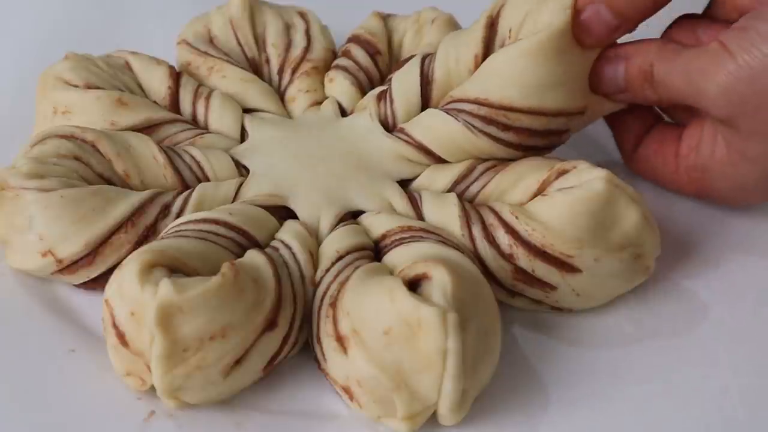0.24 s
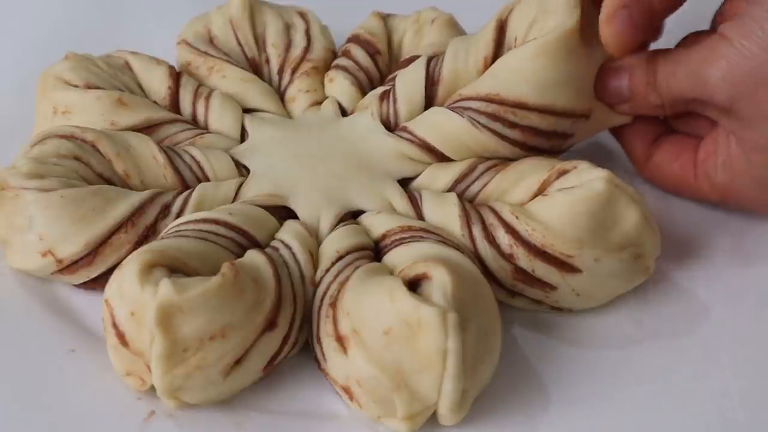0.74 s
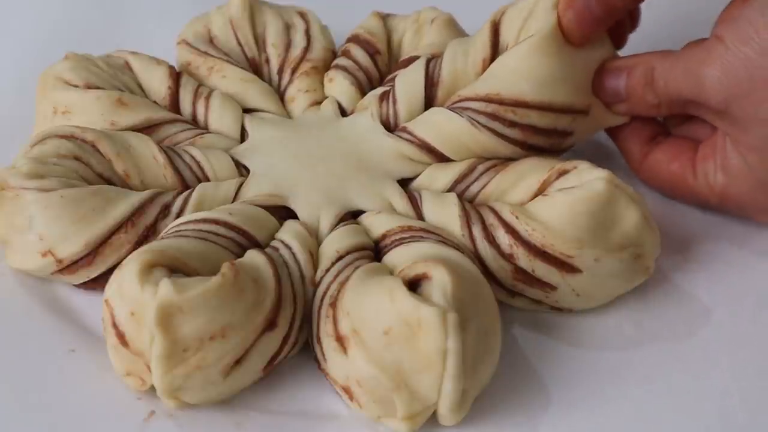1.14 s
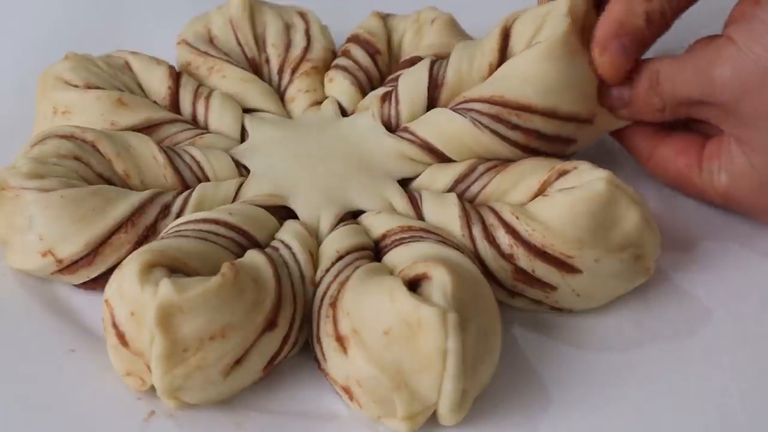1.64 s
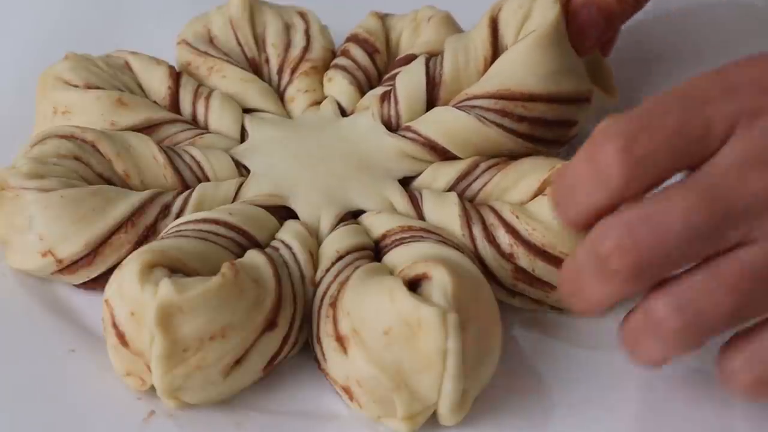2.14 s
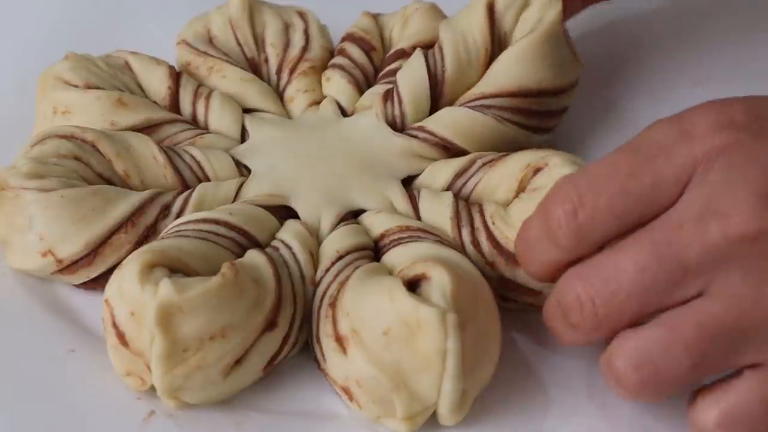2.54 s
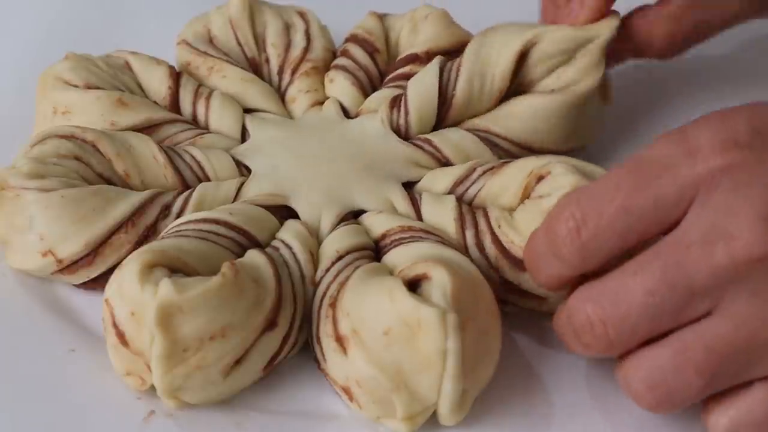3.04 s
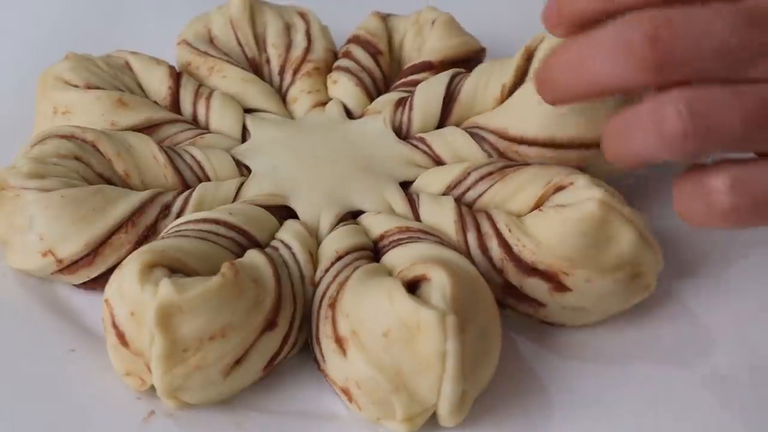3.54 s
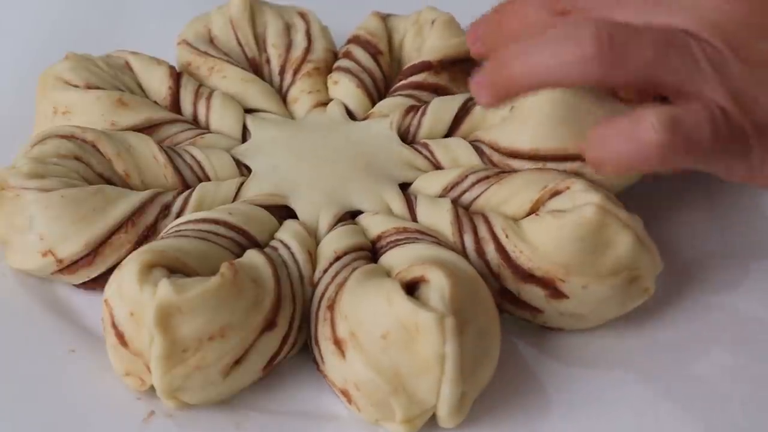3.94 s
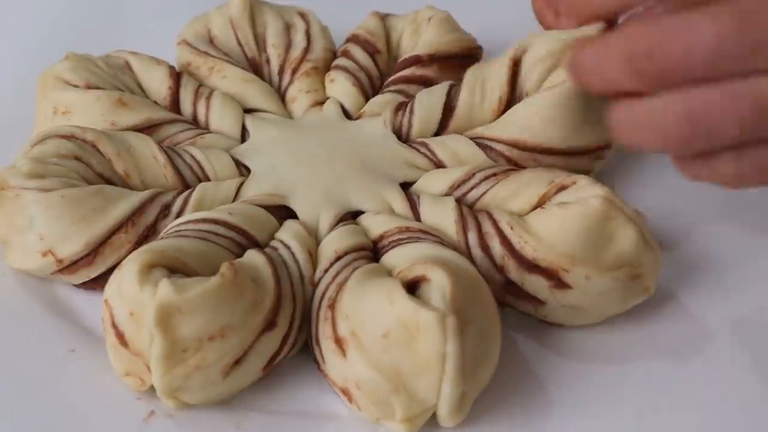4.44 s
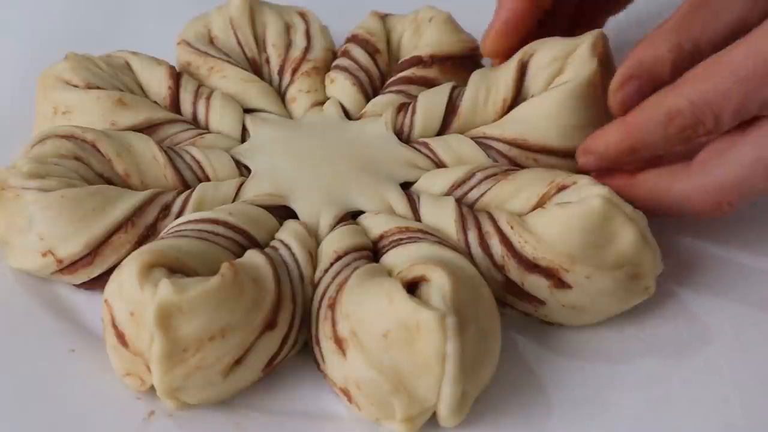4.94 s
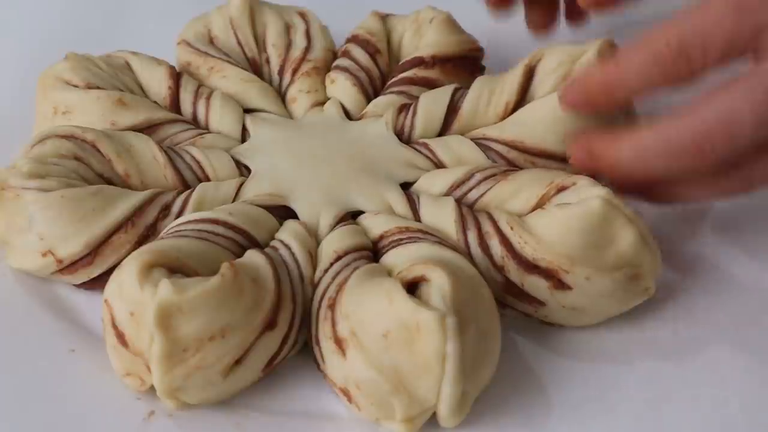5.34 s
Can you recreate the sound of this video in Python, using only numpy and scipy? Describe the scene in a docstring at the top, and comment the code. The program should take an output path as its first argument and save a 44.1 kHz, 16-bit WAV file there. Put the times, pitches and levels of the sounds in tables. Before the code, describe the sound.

Hands pinch soft dough on baking paper, making close, crisp crinkles and sharp snaps in uneven bursts.

```python
"""Sharp paper snaps and a soft rustle: hands pinch dough on baking paper, close by, in a small kitchen.
Creases buckle one by one, and each makes the sheet ring for a moment. In between, paper, skin and
dough rub together, which hisses, crackles and sometimes squeaks. The hard walls add a short echo,
a faint hum lies underneath, and the loudest snaps clip."""
import sys
import numpy as np
from scipy import signal
from scipy.fft import rfft, irfft
from scipy.io import wavfile
from scipy.ndimage import uniform_filter1d

SR = 44100
rng = np.random.default_rng(int(sys.argv[2]) if len(sys.argv) > 2 else 0)


def put_to_file(sound):
    """Save the sound as 16-bit audio at rate SR, in the file named by the first command-line argument."""
    columns = np.atleast_2d(sound).T  # one column per channel
    safe = np.clip(columns, -1, 1)
    whole_steps = np.round(safe * 32767)
    wavfile.write(sys.argv[1], SR, whole_steps.astype(np.int16))


N = 246078

# Tone of the room's hum and hiss: frequency_hz, relative_level_db
HUM_TONE = [(24, -43.5), (40, -7.5), (167, -4.5), (257, 2), (545, -4), (755, -3), (971, -7.5), (1420, -11),
            (5220, -15.5), (8210, -18), (15000, -21.5), (16200, -32.5)]
# Time the kitchen's echo takes to fade by 60 dB: frequency_hz, fade_s
ECHO_FADES = [(500, 0.26), (1500, 0.099), (4000, 0.16), (7000, 0.22), (12000, 0.21)]
# How the paper's sound is coloured on its way to the microphone: frequency_hz, gain_db
MIC_TONE = [(200, -15), (600, -0.5), (1000, -3), (1500, -0.58), (4000, -1.12), (7000, -1), (8600, -5),
            (11000, -3.5), (13500, -9), (16500, -10.5)]
# Skin or dough catching on the sheet: start_s, length_s, pitch_hz, width_hz, level_db
SQUEAKS = [(0.86, 0.027, 2080, 500, -53), (0.429, 0.05, 5330, 1507, -62.5),
           (0.542, 0.051, 4960, 1500, -61.5), (1.88, 0.044, 453, 700, -37.5), (1.953, 0.036, 400, 700, -42),
           (2.393, 0.061, 650, 400, -53.5), (3.142, 0.032, 660, 400, -57), (1.003, 0.12, 2600, 900, -52.5),
           (1.276, 0.026, 2490, 600, -62), (2.239, 0.035, 2620, 300, -54), (2.284, 0.023, 2550, 604, -57),
           (3.057, 0.016, 1094, 503, -45.5), (3.458, 0.07, 2620, 716, -44.5)]
# Strokes of the hands: full_pressure_s, build_up_s, hold_s, rustle_db, rustle_pitch_hz,
# skin_hiss_db, dough_drag_db
STROKES = [(0.002, 0.034, .02, -49, 4430, -63, -56), (0.042, 0.046, .005, -37, 3700, -50, -70),
           (0.451, .09, .03, -67, 6500, -57, -87), (0.556, .2, .015, -66, 5740, -56.5, -81),
           (0.659, .06, .01, -51.5, 5750, -57.5, -84), (0.793, 0.22, .045, -49.5, 5710, -61, -68),
           (0.952, .05, 0.054, -57, 5000, -66, -72), (1.018, 0.12, 0.05, -51, 3140, -63.5, -61),
           (1.224, .04, .03, -71, 5360, -71, -76), (1.434, .08, .03, -57.5, 5566, -58, -74),
           (1.559, .08, .003, -62, 4425, -62, -65), (1.736, 0.055, 0.055, -51, 6210, -63.5, -82),
           (1.81, 0.088, 0.027, -47, 4400, -61, -55.5), (1.871, 0.018, .005, -29.5, 3786, -55, -34),
           (1.906, .08, 0.023, -23.5, 4190, -36, -29), (2.012, 0.12, 0.044, -39.5, 4105, -68, -63),
           (2.246, .025, .025, -57, 4220, -65, -77), (2.335, .02, .025, -51, 4310, -80, -77),
           (2.399, .06, .05, -34.5, 3746, -72, -41), (2.596, 0.18, 0.012, -28, 4340, -48, -33.5),
           (2.684, .1, 0.027, -46, 4290, -70, -61), (2.837, 0.07, .03, -46, 3370, -80, -76.5),
           (3.154, 0.2, 0.043, -39.5, 4400, -52, -47), (3.272, .2, .05, -46.5, 4530, -61, -60),
           (3.37, 0.021, 0.0028, -33.5, 3790, -80, -41), (3.482, .09, 0.0092, -36.5, 5180, -51, -61),
           (3.674, .07, .003, -46.5, 4700, -60, -52), (3.897, .025, 0.077, -44.5, 4950, -60.5, -63.5),
           (3.987, 0.024, .01, -26, 4160, -49, -33.5), (4.068, 0.1, 0.027, -32, 4140, -48, -36.5),
           (4.163, .1, 0.048, -43.5, 4860, -60.5, -72), (4.289, 0.089, .03, -38, 5070, -46.5, -48),
           (4.366, 0.043, .01, -42.5, 4890, -46, -50), (4.402, 0.018, .015, -35.5, 5020, -49, -58),
           (4.453, .12, .005, -34.5, 4620, -44.5, -48), (4.606, .04, .09, -34.5, 4000, -68, -40.5),
           (4.749, 0.092, .005, -28, 4350, -45, -37.5), (4.831, 0.11, 0.0027, -35, 3600, -75, -37.5),
           (5.108, 0.028, .02, -59.5, 4520, -80, -73), (5.17, 0.11, 0.079, -43, 4690, -58.5, -58),
           (5.334, .027, .045, -23, 4770, -34.5, -41.5), (5.416, 0.13, 0.013, -28, 3996, -52, -32.5),
           (5.517, 0.084, .06, -50.5, 4215, -85, -66)]
# Creases that buckle: start_s, level_db, pitch_hz, length_ms, relative_treble_db, relative_bass_db
SNAPS = [(0.0348, -6, 4240, 1.76, -18, -38.5), (0.38, -50.5, 2700, 1.14, -21, -5),
         (0.398, -55, 2900, 1.7, -22, -4), (0.5864, -56, 5990, 1.2, 7, -14),
         (0.7662, -38.5, 4940, 2.4, -9, -21), (0.884, -49, 2130, 3.9, -25, -28),
         (0.986, -40.5, 3100, 7.2, -33, -29), (1.0108, -34.5, 2650, 13, -40, -30),
         (1.0295, -37, 2840, 3.4, -35, -21.5), (1.0658, -33.5, 2960, 3, -37, -30.5),
         (1.0775, -38, 2680, 3.2, -36, -33), (1.0956, -48, 2720, 1.0, -22, -19),
         (1.1156, -48.5, 2520, 0.63, -25, -20), (1.555, -48, 4460, 6.1, -6, -10),
         (1.8056, -21.5, 4350, 0.87, -32.5, -12), (1.839, -13, 4200, 1.3, -30, -19),
         (1.843, -22, 2980, 0.45, -49, -30), (1.884, -16, 3770, 0.89, -34, -12),
         (1.891, -1, 4280, 0.77, -20, -18.5), (1.9138, -16, 4030, 16, -6.5, -10.5),
         (1.916, -17, 4030, 4.3, -28, -14), (1.92, -12, 4300, 2.6, -38, -22),
         (1.9558, -5.5, 4400, 2.9, -12.5, -19.5), (1.9628, -2.5, 3820, 0.97, -11, -13.5),
         (2.043, -17.5, 4300, 0.41, -26, -24), (2.2883, -55.5, 2890, 7.8, -17, -10),
         (2.2957, -49, 3130, 6.1, -23, -14), (2.3734, -31.5, 3470, 3.1, -36, -12),
         (2.3925, -19.5, 3540, 11, -60, -10), (2.4119, -24.5, 4040, 2.0, -44, -5),
         (2.452, -15, 4070, 1.7, -22.5, -20.5), (2.4785, -23, 3870, 1.7, -26, -37.5),
         (2.4972, -31, 3840, 2.8, -36, -28), (2.5261, -12.5, 3950, 6.9, -24, -13),
         (2.5377, -24, 3040, 7.8, -40, -4.5), (2.5648, -15, 4100, 8.7, -37, -12.5),
         (2.5887, -19, 3730, 7, -39, -28.5), (2.596, -4, 4850, 1.7, -11, -16.5),
         (2.6351, -23.5, 3050, 7.5, -27, -6), (2.7172, -34.5, 3790, 8.9, -36, -33.5),
         (2.7444, -45, 3830, 4.4, -24, -16), (2.8148, -37.5, 2920, 2.1, -31, -12.5),
         (2.8295, -38, 3200, 1.04, -36, -21), (2.8399, -28.5, 3380, 1.1, -41.5, -25.5),
         (2.9193, -42, 3080, 8.3, -27.5, -4.5), (3.0026, -45, 2880, 0.78, -31, -9),
         (3.0615, -36, 3100, 0.74, -7.5, -5), (3.1099, -24, 5100, 1.2, -41, -30.5),
         (3.1173, -26, 4170, 0.57, -30.5, -30.5), (3.137, -21, 4370, 4.8, -44.5, -13.5),
         (3.147, -20.5, 4250, 0.5, -23, -11.5), (3.151, -11, 4330, 2.6, -21.5, -19.5),
         (3.195, -8, 3680, 0.24, -25, -36), (3.2396, -32, 3770, 2.6, -39, -13),
         (3.2942, -38.5, 3670, 4.8, -25, -13), (3.3626, -26.5, 3800, 3.2, -43, -20.5),
         (3.3708, -16, 3350, 4.7, -65, -40.5), (3.3968, -26, 3630, 2.5, -43, -20.5),
         (3.408, -31, 3960, 1.5, -44, -17), (3.451, -14.5, 4130, 1.3, -18.5, -21.5),
         (3.5418, -35, 3240, 4.7, -29, -24.5), (3.6563, -13, 4630, 2, -41, -25),
         (3.8848, -33.5, 4080, 0.4, -29, -22), (3.979, -16.5, 4870, 4.8, -26.5, -12),
         (4.0144, -21, 3280, 6, -32, -11.5), (4.0306, -22.5, 3570, 2.2, -28, -33),
         (4.051, -25.5, 4800, 5.9, -37, -9), (4.0618, -7.5, 5260, 2.8, -14.5, -17),
         (4.0664, -9, 3900, 5.8, -15, -21), (4.09, -16, 3400, 0.76, -27, -25),
         (4.2568, -40.5, 3660, 8.6, -34, -12), (4.298, -29, 5230, 6.1, -20, -31),
         (4.3107, -23, 4640, 2.4, -11, -6), (4.3304, -27, 4230, 0.54, -55.5, -6.5),
         (4.3662, -33.5, 4420, 9.6, -13, -11), (4.4518, -20.5, 3560, 1.4, -38, -27.5),
         (4.4585, -21.5, 6400, 8.6, -38, -27), (4.5736, -35.5, 4470, 0.95, -37, -12.5),
         (4.5843, -22, 4120, 1.1, -45, -18.5), (4.601, -25, 3960, 1.7, -37.5, -25),
         (4.6076, -16.5, 3530, 3.1, -40, -14.5), (4.6122, -10.5, 4450, 1, -36, -13.5),
         (4.6385, -14.5, 3130, 6.8, -38, -9.5), (4.6743, -20, 3850, 1.5, -46, -13),
         (4.7017, -26, 3480, 3.2, -35.5, -28.5), (4.7099, -24, 4260, 0.8, -38, -14),
         (4.721, -19.5, 3670, 0.99, -36, -42), (4.7402, -18, 3040, 3.1, -32, -12.5),
         (4.757, -28, 3800, 4.2, -29.5, -29), (4.778, -18.5, 3700, 1.3, -35, -12.5),
         (4.8106, -14.5, 3520, 0.4, -39, -9), (4.8222, -12, 3520, 4.5, -38, -12),
         (4.8454, -23, 3260, 5.4, -39, -16.5), (5.095, -49, 3130, 6.5, -25.5, -7.5),
         (5.2298, -23, 4010, 0.32, -43, -15.5), (5.3202, -26, 3720, 8, -30, -15),
         (5.3285, -16.5, 3720, 9.9, -44, -15), (5.3555, -19, 4600, 8.1, -5.5, -13),
         (5.3796, -17.5, 4000, 9.6, -8, -21), (5.3875, -15, 3980, 1.4, -13, -13),
         (5.412, -7, 4040, 0.92, -10.5, -17), (5.4351, -8, 4060, 1.6, -15, -21),
         (5.555, -37, 3650, 1.4, -34, -21)]

HUM_DB, ECHO_DB, FIRST_WALL_S = -63, -15, .008
BUILD_UP_DB, RELEASE_DB_PER_S = 30, (263, 331.5, 297.5)  # release of paper, skin, dough
HARD_WIDTH_HZ, LIGHT_WIDTH_HZ = 3480, 2500  # rustle of a hard and a light stroke
GRAINS_PER_S, GRAIN_SPREAD_DB, GRAIN_SHARE = 2500, 4, 0.73  # tiny creases inside the rustle
DRAG_HZ, HISS_HZ, AIR_HZ = (1067, 2280), (9300, 12400), (13000, 17000)  # low and high edges
SNAP_BASS_HZ, SNAP_TREBLE_HZ = (1102, 2300), (7500, 13700)
SNAP_OCTAVES = 0.67  # typical reach of the ring on each side of its pitch
TREBLE_LIMIT_HZ = 16050


def gain_of(db):
    """Turns decibels into a number to multiply by."""
    return 10 ** (np.asarray(db) / 20)


def unit_level(x):
    """Scales a sound so that its average level (rms) is 1."""
    return x / np.sqrt(np.mean(x ** 2) + 1e-20)


def unit_peak(x, samples):
    """Scales a sound so that its loudest stretch of this many samples has rms 1."""
    return x / np.sqrt(uniform_filter1d(x ** 2, samples).max() + 1e-20)


def value_at(table, hz):
    """Looks up values between a table's rows, on a log-frequency scale."""
    table_hz, value = np.transpose(table)
    return np.interp(np.log(hz + 1), np.log(table_hz + 1), value)


def band(x, edges_hz, order):
    """Keeps the frequencies between two edges; a higher order cuts more sharply."""
    return signal.sosfilt(signal.butter(order, edges_hz, "bandpass", fs=SR, output="sos"), x)


def moving_band(x, hz, width_hz):
    """Keeps a band around a gliding pitch: shift it to zero, filter, shift it back."""
    turn = np.exp(2j * np.pi * np.cumsum(hz) / SR)
    low_pass = signal.butter(3, width_hz / 2, fs=SR, output="sos")
    return (turn * signal.sosfilt(low_pass, x / turn)).real


def room_hum():
    """Steady noise, shaped into a low room hum and a faint microphone hiss."""
    tone = gain_of(value_at(HUM_TONE, np.fft.rfftfreq(N, 1 / SR)))
    return gain_of(HUM_DB) * unit_level(irfft(rfft(rng.standard_normal(N)) * tone, N))


def kitchen_echo(x):
    """Hard walls send back many small echoes, and each frequency fades at its own speed."""
    echoes = np.zeros(SR // 2)
    slots = np.arange(0, len(echoes) - 12, 12)  # one echo somewhere in every 12 samples
    echoes[slots + rng.integers(0, 12, len(slots))] = rng.choice([-1., 1.], len(slots))
    hz, t, spectrum = signal.stft(echoes, SR, nperseg=256)
    fade = gain_of(-60 * t / value_at(ECHO_FADES, hz)[:, None])
    tail = signal.istft(spectrum * fade, SR, nperseg=256)[1]
    tail *= np.clip(np.arange(len(tail)) / SR / FIRST_WALL_S, 0, 1) ** 3  # the echoes build up
    return signal.fftconvolve(x, tail / np.linalg.norm(tail))[:N]


def squeaks():
    """Skin or dough catches on the sheet: a short swell of noise, low and dull or high and thin."""
    out = np.zeros(N)
    for start_s, length_s, hz, width_hz, db in SQUEAKS:
        edges_hz = (max(hz - width_hz / 2, 30), hz + width_hz / 2)
        rub = unit_level(band(rng.standard_normal(SR // 5), edges_hz, order=2))[:round(length_s * SR)]
        swell = signal.windows.tukey(len(rub), .6)
        out[round(start_s * SR):][:len(rub)] += gain_of(db) * rub * swell
    return out


def hand_pressure():
    """Strokes build up, hold and let go. Gives paper, skin and dough levels (dB) and the rustle's pitch."""
    full_s, build_s, hold_s, rustle_db, hz, hiss_db, drag_db = np.transpose(STROKES)[:, :, None]
    t = np.arange(0, N + 64, 64) / SR
    build_left = np.maximum(full_s - t, 0) / np.maximum(build_s, .005)
    released_s = np.maximum(t - full_s - hold_s, 0)
    powers = [gain_of(2 * (db - BUILD_UP_DB * build_left - fall * released_s)) + 1e-13
              for db, fall in zip((rustle_db, hiss_db, drag_db), RELEASE_DB_PER_S)]
    levels_db = [10 * np.log10(power.sum(0)) for power in powers]  # overlapping strokes add up
    pitch_hz = (powers[0] * hz).sum(0) / powers[0].sum(0)  # the loudest stroke counts most
    return (np.interp(np.arange(N) / SR, t, curve) for curve in levels_db + [pitch_hz])


def sliding_hands():
    """Uneven rubbing and tiny creases make the paper rustle, the skin hiss and the dough drag."""
    rustle_db, hiss_db, drag_db, pitch_hz = hand_pressure()
    wobble = uniform_filter1d(uniform_filter1d(rng.standard_normal(N), size=200), size=200)
    clumps = gain_of(1.4 * unit_level(wobble))
    grains = gain_of(GRAIN_SPREAD_DB * np.minimum(rng.exponential(1, N), 2.5))
    grains *= rng.random(N) < GRAINS_PER_S / SR
    grains *= rng.choice([-1., 1.], N)
    crackle = np.clip(GRAIN_SHARE + 0.017 * (rustle_db + 37.5), 0, .8)  # light strokes mostly hiss
    rub = clumps * (crackle * unit_level(grains) + np.sqrt(1 - crackle ** 2) * rng.standard_normal(N))
    hardness = np.clip(0.5 + 0.043 * (rustle_db + 52.5), 0, 1)  # harder strokes sound a wider band
    wide = unit_level(moving_band(rub, pitch_hz, HARD_WIDTH_HZ))
    narrow = unit_level(moving_band(rub, pitch_hz, LIGHT_WIDTH_HZ))
    paper = gain_of(rustle_db) * (hardness * wide + (1 - hardness) * narrow)
    smooth_rub = rub + 1.4 * clumps * rng.standard_normal(N)  # skin and dough crackle less than paper
    skin = gain_of(hiss_db) * unit_level(band(smooth_rub, HISS_HZ, order=4))
    air_db = -37.5 + 4.2 * (hiss_db + 32.5)  # fast strokes reach the highest treble
    skin += gain_of(air_db) * unit_level(band(smooth_rub, AIR_HZ, order=2))
    dough = gain_of(drag_db) * unit_level(band(smooth_rub, DRAG_HZ, order=3))
    return paper + skin + dough


def crease_snaps():
    """A crease runs through the sheet for a moment, stops short, and settles in a faint crackle."""
    size = 2048
    out = np.zeros(N + size)
    ms = np.arange(size) * 1000 / SR
    for start_s, db, hz, length_ms, treble_db, bass_db in SNAPS:
        attack = np.minimum(ms / .25, 1)
        run = gain_of(-1.5 * ms - 4.8 * np.maximum(ms - length_ms, 0))
        settle = gain_of(-24 - .5 * ms) * np.linspace(1, 0, size)
        kick = rng.standard_normal(size) * attack * (run + settle)
        kick[12] += 6.2 / (1 + length_ms / 3)  # the first break clicks, most strongly in short snaps
        spread = 2 ** np.clip(SNAP_OCTAVES + 0.0021 * (db + 23.5), .15, .9)  # faint snaps are narrower
        ring = band(kick, (hz / spread, hz * spread), order=3)
        ring = unit_peak(band(ring, (hz / 1.317, hz * 1.243), order=1), samples=44)  # stress the pitch
        treble = gain_of(treble_db) * unit_peak(band(kick, SNAP_TREBLE_HZ, order=4), samples=66)
        bass = gain_of(bass_db) * unit_peak(band(kick, SNAP_BASS_HZ, order=2), samples=110)
        out[round(start_s * SR):][:size] += gain_of(db) * (ring + treble + bass)
    return out[:N]


def scene():
    """Mixes the paper sounds, their echo and the hum into one channel."""
    hz = np.linspace(0, SR / 2, 257)
    mic_power = gain_of(value_at(MIC_TONE, hz)) ** 2  # squared, as minimum_phase takes the root
    mic_filter = signal.minimum_phase(signal.firwin2(255, hz, mic_power, fs=SR))
    paper = signal.oaconvolve(crease_snaps() + sliding_hands() + squeaks(), mic_filter)[:N]
    return (paper + gain_of(ECHO_DB) * kitchen_echo(paper) + room_hum())[None]


def record(dry):
    """Clips the peaks that pass full scale, then cuts the very highest treble."""
    low_pass = signal.firwin(511, TREBLE_LIMIT_HZ, window=("kaiser", 9), fs=SR)
    return signal.oaconvolve(np.clip(dry, -1, 1), low_pass[None], "same")


dry = scene()
out = record(dry)
put_to_file(out)
```